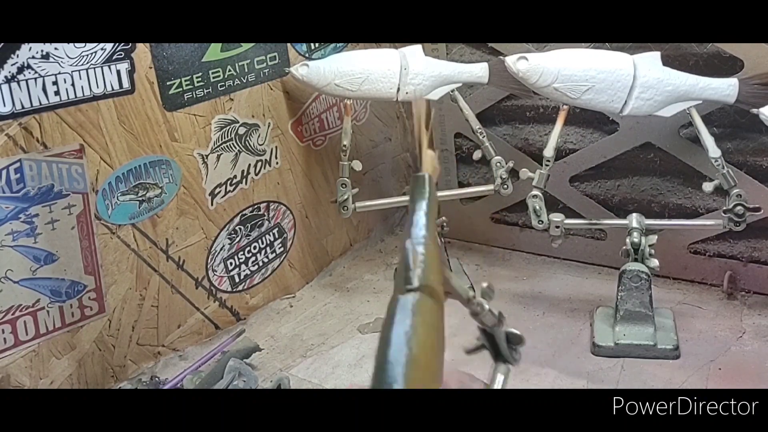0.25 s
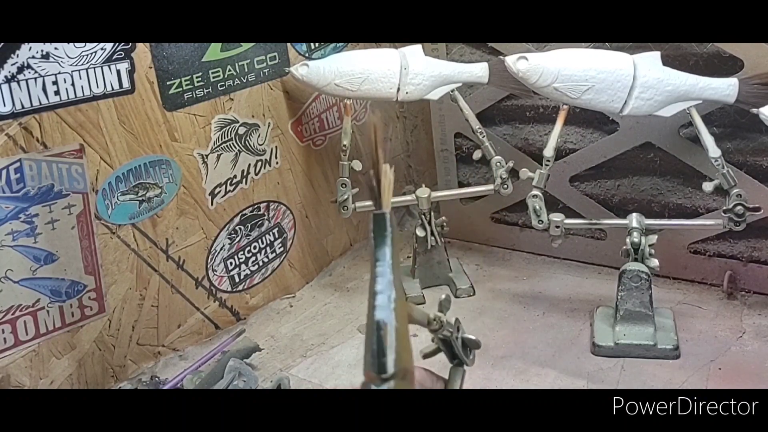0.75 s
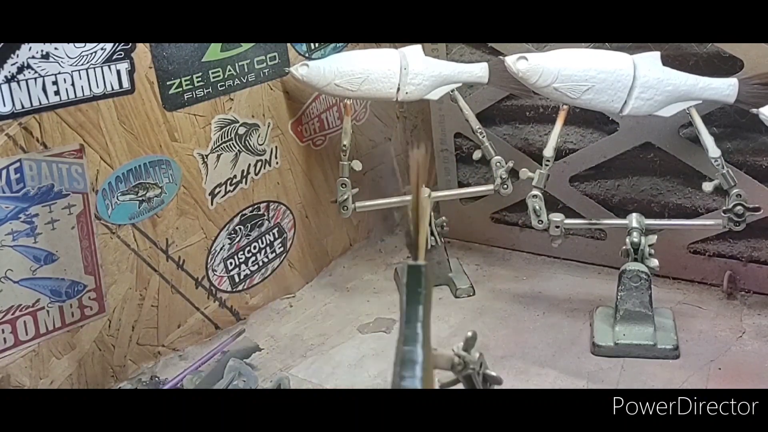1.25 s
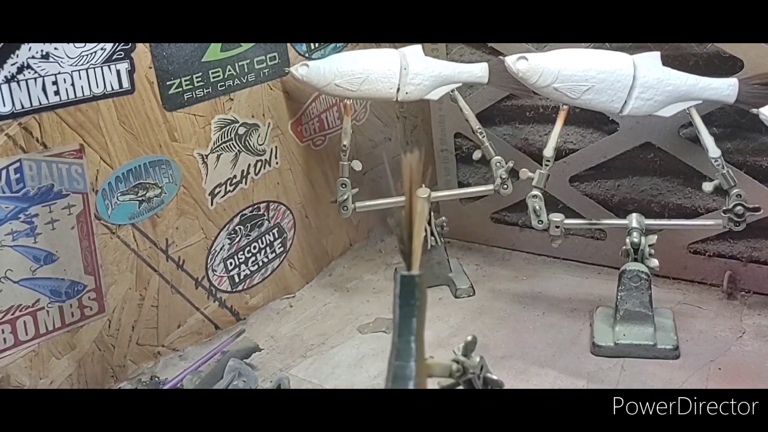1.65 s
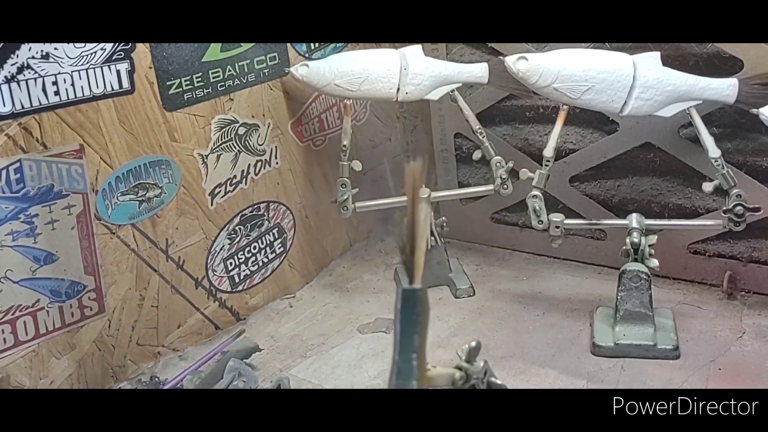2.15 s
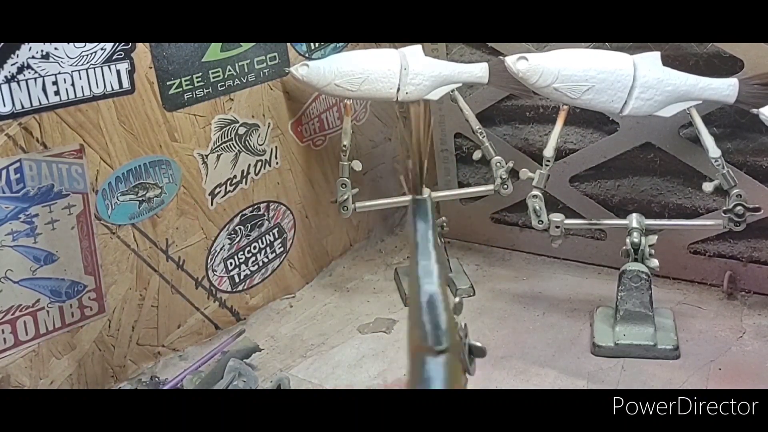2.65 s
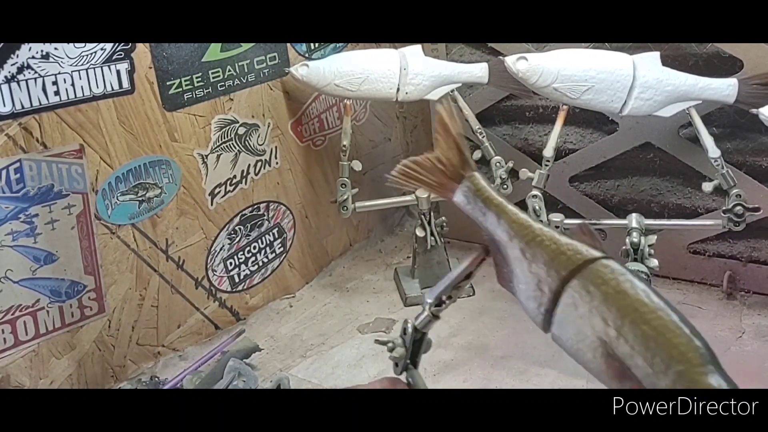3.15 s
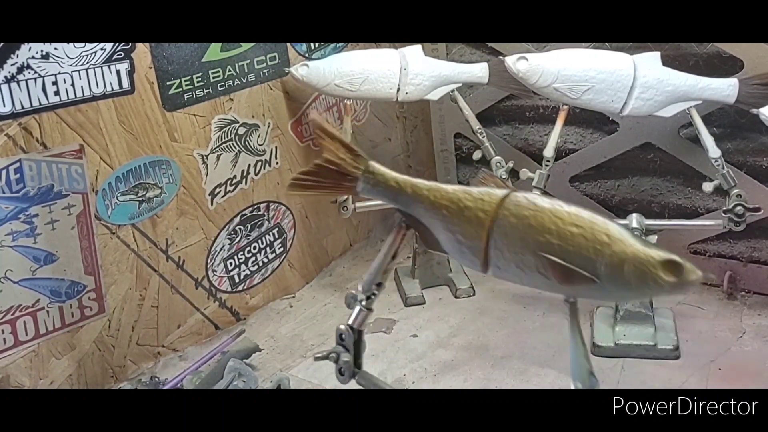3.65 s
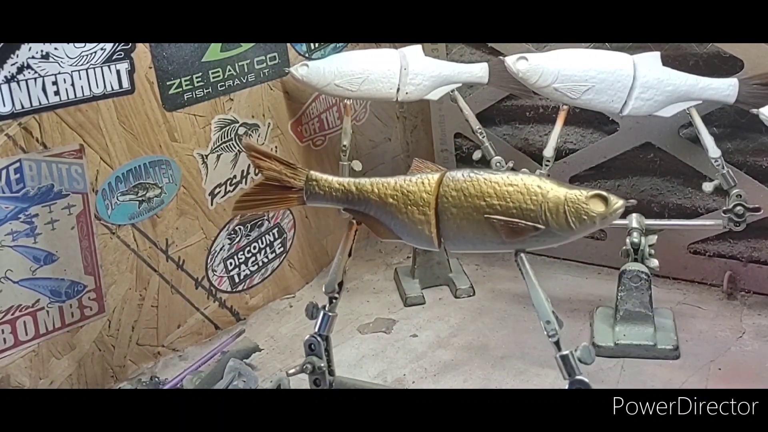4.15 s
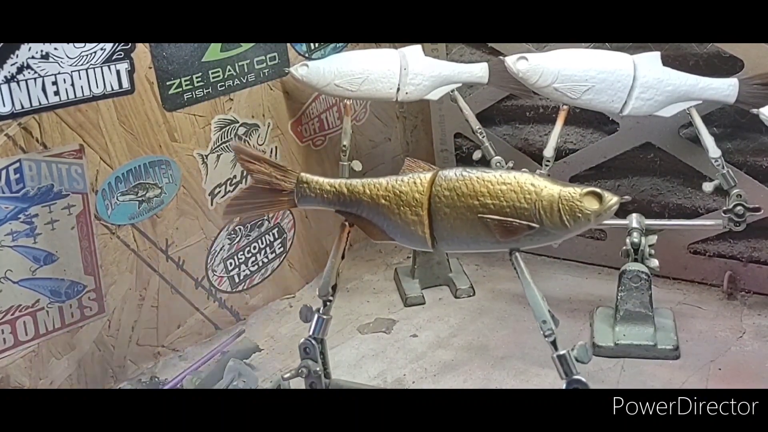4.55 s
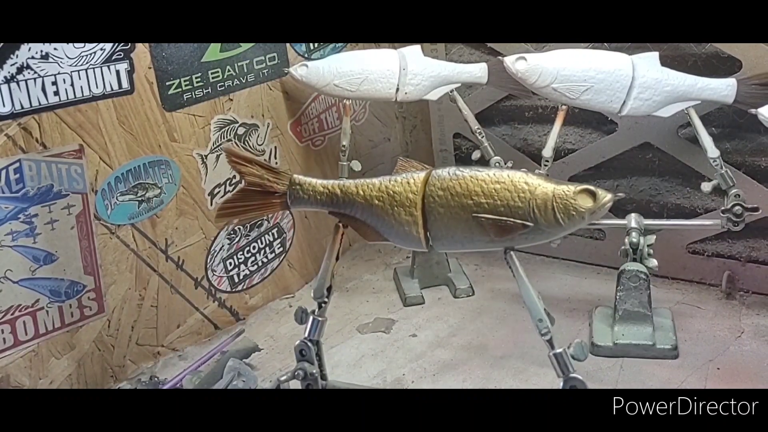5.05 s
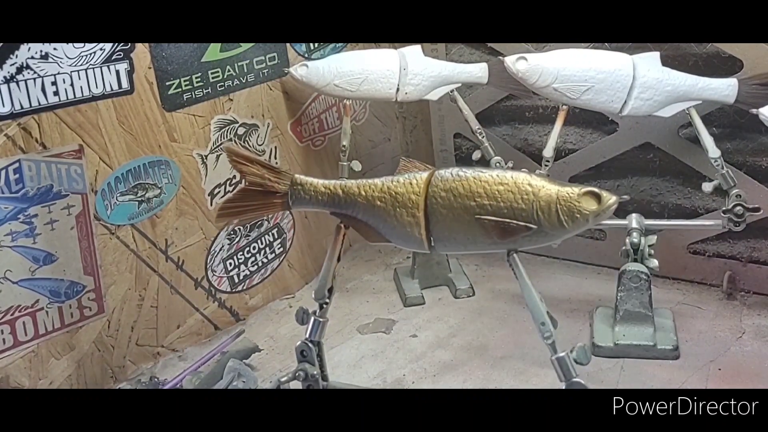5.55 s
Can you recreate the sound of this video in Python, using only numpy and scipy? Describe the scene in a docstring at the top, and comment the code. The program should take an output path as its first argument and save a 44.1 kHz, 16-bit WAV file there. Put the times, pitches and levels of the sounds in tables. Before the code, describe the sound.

A small, dry workshop with faint low room noise and a wavering fan hum, picked up close in stereo. From 0 to 0.9 s a lure stand drags dully on the bench, with a cluster of sharp, ringing creaks around 0.3-0.6 s and faint thin paired tones. An airbrush sprays bright, breathy hiss at 1.16-1.5 s and again, shorter, at 2.04-2.23 s; each opens quickly, holds and cuts off with a metallic tick. As each ends, low air gusts thump the left microphone, the second much harder. From 2.8 to 4.3 s a distant bird sings about eleven quick falling, echoing chirps, while a soft bump lands at 3.13 s and dry cracks, rubs and small knocks follow, densest near 3.8 s. Two more sprays come at 4.6-4.9 s and 5.23-5.54 s, slightly left. A very faint click follows the first, a clear one the last at 5.6 s.

```python
"""In a small workshop, close to the left microphone, an airbrush sprays a fishing lure in four bursts.
Each burst is turbulent noise combed by reflections; a click of the valve with ringing metal ends it.
Low-frequency eddies from the jet twice buffet the microphone. The lure's stand creaks in noise cracks
with ringing modes, and drags and bumps on the bench. A bird outside sings falling notes as gliding
sines, thin pairs of tones come and go, and a fan hums as wavering lines over faint room noise."""
import sys
import numpy as np
from scipy import signal
from scipy.fft import rfft, irfft
from scipy.io import wavfile
from scipy.ndimage import uniform_filter1d

SR = 44100
rng = np.random.default_rng(int(sys.argv[2]) if len(sys.argv) > 2 else 0)


def persist_wave(psi):
    """Save psi, clipped to +-1, as 16-bit WAV."""
    counts = np.round(np.clip(psi, -1, 1) * 32767).astype(np.int16)
    wavfile.write(sys.argv[1], SR, np.atleast_2d(counts).T)


N = 255780
TIME = np.arange(N) / SR
BIN_HZ = np.fft.rfftfreq(N, 1 / SR)


def undb(db):
    """Logarithmic level: decibels become an amplitude gain."""
    return 10 ** (np.asarray(db) / 20)


def unit(x):
    """Normalisation: scale to an rms of 1."""
    return x / np.sqrt(np.mean(x ** 2))


def db_at(points, hz):
    """Spectral envelope: interpolate (Hz, dB) points on a log-frequency axis."""
    point_hz, db = np.transpose(points)
    return np.interp(np.log(hz + 1), np.log(point_hz), db)


def tint(x, db):
    """Linear filtering: apply a gain in dB to every frequency bin."""
    return irfft(rfft(x) * undb(db), N)


def steep_lowpass_db(corner_hz):
    """Butterworth response: the gain in dB of a second-order low-pass at every frequency bin."""
    return -10 * np.log10(1 + (BIN_HZ / corner_hz) ** 4)


def noise(colour):
    """Coloured noise: uncorrelated left and right of one spectrum, rms 1."""
    white = rng.standard_normal((2, N))
    return unit(tint(white, db_at(colour, BIN_HZ)))


def walk(rate):
    """Slow random modulation: random steps at the given rate in Hz, smoothed, rms 1."""
    size = int(SR / rate)
    steps = np.repeat(rng.standard_normal(N // size + 1), size)
    return unit(uniform_filter1d(steps, size)[:N])


def lowpass(x, hz):
    """Treble attenuation: a second-order Butterworth low-pass."""
    return signal.sosfilt(signal.butter(2, hz, fs=SR, output="sos"), x)


def pan(db):
    """Interaural level difference: left and right gains for left minus right in dB."""
    return undb(np.array([[db], [-db]]) / 2)


def add(out, s, sound):
    """Superposition: mix a sound in at s seconds."""
    start = max(int(s * SR), 0)
    out[:, start:start + sound.shape[-1]] += sound[..., :N - start]


def fade(t, t60):
    """Exponential decay: 60 dB down after t60 seconds."""
    return np.exp(-np.log(1000) * t / t60)


def ring(modes, t):
    """Modal synthesis: decaying sines, each with its own random phase at the two microphones."""
    total = 0
    for hz, db, t60 in modes:
        cycles = hz * t + rng.random((2, 1))
        total = total + undb(db) * fade(t, t60) * np.sin(2 * np.pi * cycles)
    return total


def swell(events, shape):
    """Gain envelopes, summed: each is 20 dB down one rise before and one fall after its peak."""
    total = 0
    for s, db, rise, fall in events:
        distance = np.maximum((s - TIME) / rise, (TIME - s) / fall)
        total = total + undb(db - 20 * distance ** shape)
    return total


def reverb(x, t60, wet_db):
    """Diffuse reverberation: the sound plus dense, exponentially decaying reflections."""
    t = TIME[:SR // 2]
    tail = rng.standard_normal((2, len(t))) * fade(t, t60) * (t > .003)
    tail /= np.sqrt(np.sum(tail ** 2) / 2)
    return x + undb(wet_db) * signal.fftconvolve(x, tail, axes=1)[:, :N]


# Spectrum of the quiet room. Each row: frequency in Hz, relative level in dB per Hz.
ROOM_COLOUR = [(25, -34.5), (45, -14.5), (70, -4), (110, -7), (150, -15.5), (270, -16.5), (420, -21),
               (850, -24.5), (1200, -30.5), (1950, -29), (3700, -29.5), (7000, -37.5), (11000, -40),
               (15400, -46.5)]
# Lines of the fan. Each row: frequency in Hz, level in dB about which it wavers.
FAN_LINES = [(120, -63), (357, -75.5), (1005, -86), (1534, -85), (1890, -91), (2710, -88.5), (3752, -92),
             (10907, -90)]


def workshop(room_db=-58, side_db=2.0, waver_db=3.5):
    """Spatial coherence: long waves reach both microphones alike; the fan adds wavering sine lines."""
    spread = 1 / (1 + (230 / (BIN_HZ + 1)) ** 2)
    mid, side = rfft(noise(ROOM_COLOUR))
    out = irfft(mid + np.outer([1, -1], side * spread) * undb(side_db), N) * undb(room_db)
    for line_hz, db in FAN_LINES:
        # the higher the line, the further apart its left and right phases may lie, up to half a cycle
        offset = rng.random((2, 1)) * min(line_hz / 3000, .5)
        cycles = np.cumsum(line_hz + 3 * walk(16)) / SR + offset
        out = out + undb(db + waver_db * walk(1.93)) * np.sin(2 * np.pi * cycles)
    return out


# Faint far-off pairs of tones. Each row: start in seconds, lower frequency in Hz,
# upper frequency in Hz, level of the lower tone in dB before it swells and wavers.
TONE_PAIRS = [(0, 879, 1206, -56), (.623, 900, 1200, -63), (4.35, 878, 1340, -68.5), (5.58, 815, 1440, -62)]


def far_tones(duration_s=0.29, upper_db=-6.0, sag=0.011, waver_db=6.0):
    """Amplitude and frequency modulation: thin tone pairs swell, waver, sag a little in pitch and fade."""
    out = np.zeros((2, N))
    u = np.arange(int(duration_s * SR)) / (duration_s * SR)
    for s, lower_hz, upper_hz, db in TONE_PAIRS:
        for hz, tone_db in (lower_hz, db), (upper_hz, db + upper_db):
            pitch = hz * (1 + sag * (.5 - u)) + 9 * walk(110)[:len(u)]
            cycles = np.cumsum(pitch) / SR + rng.random((2, 1)) / 2
            gain = undb(tone_db + waver_db * walk(30)[:len(u)]) * np.sqrt(np.sin(np.pi * u))
            add(out, s, gain * np.sin(2 * np.pi * cycles))
    return out


# The bird's run. Each row: start in seconds, level in dB relative to the other notes.
BIRD_NOTES = [(2.827, -39), (2.97, -37.5), (3.11, -37), (3.238, -37.5), (3.365, -36.5), (3.513, -36),
              (3.661, -36.5), (3.81, -34.5), (3.961, -37.5), (4.123, -39), (4.279, -37)]


def bird(note_s=.048, settled_hz=4564, start_high_hz=421, settle_s=.28, drop=.35, drop_spread=0.078,
         octave_db=-10, octave_hz=7400, octave_width_hz=600, level_db=-8.0):
    """Frequency glides: whistled notes hang and then plunge with a rasp, smeared by echoes."""
    out = np.zeros((2, N))
    rasp = walk(1500)
    u = np.arange(int(note_s * SR)) / (note_s * SR)
    envelope = np.interp(u, [0, .12, .22, .6, 1], [0.063, 0.2, 1.0, 1.0, 0.34])
    for s, db in BIRD_NOTES:
        # the run starts high and settles on one pitch
        top_hz = settled_hz + start_high_hz * np.exp(-((s - BIRD_NOTES[0][0]) / settle_s) ** 2)
        plunge = drop * (1 + drop_spread * rng.uniform(-0.93, 1))  # no two notes fall alike
        roughness = .08 * u ** 1.4 * rasp[int(s * SR):][:len(u)]
        hz = top_hz * (1 - plunge * u ** 2.3 + roughness)
        phase = 2 * np.pi * np.cumsum(hz) / SR
        # the octave swells as it crosses a resonance of the beak
        beak = 1 / np.hypot(1, (2 * hz - octave_hz) / octave_width_hz)
        tone = np.sin(phase) + undb(octave_db) * beak * np.sin(2 * phase)
        add(out, s, undb(db + level_db) * envelope * tone)
    scattered = reverb(out, t60=.24, wet_db=11)
    return reverb(scattered, t60=0.4, wet_db=-8)


# Spectrum of the shaken boards. Each row: frequency in Hz, relative level in dB per Hz.
BOARD_COLOUR = [(25, -38), (50, -10), (80, -7.5), (120, 5), (165, -7), (220, -5.5), (330, -11), (450, -18),
                (650, -22.5), (1400, -33), (2600, -33), (5000, -53.5)]
# The stand drags. Each row: time of the peak in seconds, level in dB, rise in seconds, fall in seconds.
BENCH_DRAGS = [(.06, -34.5, 0.42, 0.52), (.31, -45, 0.064, 0.18), (.805, -37.5, .022, 0.26)]
# Soft bumps. Each row: start in seconds, level in dB that scales the board modes.
BENCH_BUMPS = [(3.128, -25), (3.225, -40), (3.319, -43.5), (3.473, -47), (3.79, -39), (3.848, -41)]


def bench(apart_db=-13, push_s=0.0045):
    """Structure-borne sound: drags and bumps shake the boards, nearly alike at both microphones."""
    common, apart = noise(BOARD_COLOUR)
    rumble = common + undb(apart_db) * np.outer([1, -1], apart)
    out = rumble * swell(BENCH_DRAGS, shape=1.16)
    t = TIME[:SR // 3]
    # Each row: frequency in Hz, relative level in dB, 60 dB decay time in seconds.
    boards = [(78.7, -5.0, 0.14), (118.0, 2.0, 0.084), (176.6, -15, 0.18), (250, -11.5, 0.048),
              (370, -15, 0.033)]
    for s, db in BENCH_BUMPS:
        push = np.minimum(t / push_s, 1)
        add(out, s, undb(db) * push * ring(boards, t)[0])
    return out


# The joints slip. Each row: start in seconds, level in dB that scales the crack and the ringing,
# relative level in dB of the crack's low part.
JOINT_SLIPS = [(0.3088, -37, 18.5), (0.3297, -19, 8), (0.3397, -27, 11), (0.3478, -15.5, 0),
               (0.4181, -31.5, 9), (0.4612, -35.5, 11), (0.4746, -32, 0), (0.5624, -38, -10),
               (2.84, -41.5, -9), (2.9273, -42.5, 0), (3.142, -32.5, 8), (3.4901, -36.5, -9),
               (3.693, -33, -9), (3.784, -27, 0), (3.7911, -29, 15.5), (3.8286, -30.5, 8),
               (3.8476, -27, -8), (3.868, -27.5, -7), (3.912, -32.5, -13), (4.2297, -35.5, -10)]
# Spectrum of a slip. Each row: frequency in Hz, relative level in dB per Hz.
JOINT_COLOUR = [(290, -59.5), (500, -18), (2390, -14.5), (2680, -5.5), (4000, -10), (4960, -3),
                (5480, -4.5), (8190, -4), (11400, -8.5), (15400, -16.5)]
# Modes of the stand. Each row: frequency in Hz before the grip shifts it, relative level in dB,
# 60 dB decay time in seconds before the grip shifts it.
JOINT_MODES = [(2960, 4, 0.028), (4910, -7, 0.05), (6800, 2, .04), (7060, 13.5, 0.062), (7690, 18, 0.026),
               (7800, -9, 0.082)]
# Finger strokes. Each row: time of the peak in seconds, relative level in dB,
# rise in seconds, fall in seconds.
FINGER_RUBS = [(.1, -62, .6, 0.78), (.345, -40, 0.072, .035), (.48, -57, 0.073, 0.069),
               (.81, -63, 0.22, 0.39), (3.17, -52.5, 0.038, 0.48), (3.57, -49.5, 0.12, 0.069),
               (3.82, -48, 0.16, 0.17), (4.02, -43.5, 0.086, 0.045), (4.33, -58, 0.42, 0.1)]


def stand(crack_t60=0.017, ring_db=-22, body_db=-4, rub_db=-1, rise_s=0.00056):
    """Stick-slip friction: tight joints give dry cracks that ring the stand; fingers rub unevenly."""
    out, grit, t = np.zeros((2, N)), noise(JOINT_COLOUR), TIME[:SR // 6]
    body = lowpass(noise(JOINT_COLOUR), 2600)
    for s, db, low_db in JOINT_SLIPS:
        span = int(s * SR) + np.arange(len(t))
        crack = (grit[:, span] + undb(body_db + low_db) * body[:, span]) * fade(t, crack_t60)
        grip = 1 + 0.035 * rng.standard_normal()  # the hand's grip shifts the modes
        sound = crack + undb(ring_db) * ring(JOINT_MODES, t * grip)
        add(out, s, undb(db) * np.minimum(t / rise_s, 1) * sound)
    catching_db = 3 * walk(300) + 2.5 * walk(35)
    return out + grit * swell(FINGER_RUBS, shape=1.25) * undb(rub_db + catching_db)


# Spectrum of the eddies. Each row: frequency in Hz, relative level in dB per Hz.
EDDY_COLOUR = [(20, -25.5), (50, -12), (78, 4), (125, -2), (155, -9.5), (190, -4), (300, -13.5), (500, -26),
               (850, -32), (2000, -52)]
# Gusts at the left microphone. Each row: time of the peak in seconds, level in dB,
# rise in seconds, fall in seconds.
JET_GUSTS = [(1.523, -19, 0.057, 0.054), (2.18, -35, 0.16, 0.14), (2.243, -12.5, .028, 0.047),
             (4.83, -41, .15, 0.11), (5.235, -45.5, 0.018, 0.16)]
# Large eddies strike the left port. Each row: time of the core in seconds, half-length in seconds,
# peak level in dB.
EDDY_PUFFS = [(1.514, 0.0027, -13.5), (2.248, .0018, -1), (2.274, 0.0017, -14.5)]


def draught(lean_db=28, dull_hz=260, fierce_db=-14):
    """Turbulent pressure: eddies roll over the left microphone port; weak ones of their own reach the right."""
    eddies = noise(EDDY_COLOUR)
    strength = np.sqrt(uniform_filter1d(eddies ** 2, size=SR // 50))
    eddies = unit(eddies / strength ** .7)  # successive eddies are of similar strength
    gust = swell(JET_GUSTS, shape=1.47)
    # only a fierce gust breaks into small, bright eddies
    large = tint(eddies, steep_lowpass_db(dull_hz))
    brightness = np.sqrt(np.minimum(gust / undb(fierce_db), 1))
    left, right = gust * (large + (eddies - large) * brightness)
    for s, half_s, db in EDDY_PUFFS:
        u = (TIME - s) / half_s
        # sharp suction at the core, a push either side
        left = left + undb(db) * (u ** 2 - 1) / (1 + u ** 2) ** 2
    return np.array([left, undb(-lean_db) * right])


# Spectrum of the jet. Each row: frequency in Hz, relative level in dB per Hz.
JET_COLOUR = [(210, -41.5), (350, -23), (504, -25.5), (797, -20.5), (1200, -22.5), (1320, -16), (1480, -20),
              (2920, -10), (4010, -9.5), (7200, -2.5), (8850, -2.5), (12900, -1.5), (15400, -3)]
# The air valve snaps shut. Each row: start in seconds, relative level of the tick in dB,
# level of the last puff of air in dB, left minus right in dB.
VALVE_CLICKS = [(1.5426, -24.5, -30, -2), (2.2689, -24, -31, -4.5), (4.9877, -38, -47, 2),
                (5.6036, -19.5, -41, 4)]
# Modes of the airbrush body. Each row: frequency in Hz, relative level in dB, 60 dB decay time in seconds.
BODY_MODES = [(8200, 0, .16), (8860, -6, .04), (11590, 2, .018), (11740, -7, .06), (12030, -9, .05),
              (13910, -9, .05), (14380, -8, .05)]


def valve(tick_db=5, tick_t60=0.004, puff_t60=0.11, ring_db=-15):
    """Impact excitation: the seating valve ticks, rings the metal body and lets out a last puff."""
    out, air, t = np.zeros((2, N)), noise(JET_COLOUR), TIME[:SR // 4]
    for s, db, puff_db, lean_db in VALVE_CLICKS:
        escape = undb(db + tick_db) * fade(t, tick_t60) + undb(puff_db) * fade(t, puff_t60)
        span = (int(s * SR) + np.arange(len(t))) % N
        snap = air[:, span] * escape
        add(out, s, pan(lean_db) * (snap + undb(db + ring_db) * ring(BODY_MODES, t)))
    return out


# Pulls of the trigger. Each row: pressed at in seconds, released at in seconds, relative level in dB,
# left minus right in dB once the aim has settled, time constant of easing open in seconds.
TRIGGER_PULLS = [(1.159, 1.51, -20.5, 0.5, 0.043), (2.039, 2.231, -21, 2, 0.024),
                 (4.588, 4.905, -20.5, 3.5, 0.039), (5.228, 5.538, -21, 2, 0.024)]


def trigger(crack_s=0.0084, crack_db=-15.5, bleed_db_per_s=730, aim_db=8, aim_s=0.068, unlean_db_per_s=194):
    """Flow control: each pull cracks the valve quickly, eases it open, holds, then bleeds the air away."""
    flow = 0
    for pressed, released, db, lean_db, ease_s in TRIGGER_PULLS:
        age = np.maximum(TIME - pressed, 0)
        closing = np.maximum(TIME - released, 0)
        air_db = db + crack_db * np.exp(-age / ease_s) - bleed_db_per_s * closing
        # the jet starts aimed near the left microphone and swings onto the lure; dying, it loses its lean
        side_db = lean_db + aim_db * np.exp(-age / aim_s) - unlean_db_per_s * closing
        flow = flow + np.minimum(age / crack_s, 1) * undb(air_db + np.outer([1, -1], side_db) / 2)
    return flow


def paths(x, bounce, sway, count=7, order=4):
    """Comb filtering: direct sound plus bounces off lure, stand and walls that shift as the hand moves."""
    fine = signal.resample_poly(x, order, 1)  # upsampled, for finely graded delays
    out = x
    for lag in rng.uniform(0.0004025, .005, count):
        arrival = (TIME - lag - sway * walk(1.497)) * order * SR
        index = np.clip(np.rint(arrival).astype(int), 0, len(fine) - 1)
        out = out + bounce * fine[index]
    return unit(out)


# The right microphone lies in shadow. Each row: frequency in Hz, extra left minus right in dB.
SHADOW = [(200, -8.5), (1200, 3.5), (2200, 2.5), (4500, 2), (7200, 0), (9500, 2.5), (13000, 6.5),
          (15500, 2.5)]


def spray(level_db=2, flutter_db=0.72, sway_s=.00006, port_lag_s=.0003, body_hz=3500, body_growth=0.93):
    """Jet noise: one turbulent jet hisses, and each microphone hears it through its own comb of reflections."""
    jet = noise(JET_COLOUR)[0]
    left = paths(jet, .2, sway_s)
    right = paths(np.roll(jet, int(port_lag_s * SR)), .4, sway_s)
    # the cloud of spray around the lure adds hiss that is unrelated left and right
    hiss = unit(np.array([left, right]) + .8 * noise(JET_COLOUR))
    hiss = tint(hiss, np.outer([1, -1], db_at(SHADOW, BIN_HZ)) / 2)
    flow = trigger()
    # a half-open valve hisses thinly; the large, low eddies need full flow
    opening = np.minimum(flow.mean(axis=0) / undb(-21.5), 1)
    body = tint(hiss, steep_lowpass_db(body_hz))
    hiss = hiss - body * (1 - opening ** body_growth)
    return hiss * flow * undb(level_db + flutter_db * walk(70))


def scene():
    """Superposition of sources: close sounds in a small, dry room, over the bird, far tones and fan."""
    background = workshop() + far_tones() + bird()
    handling = bench() + reverb(stand(), t60=0.12, wet_db=-6.0)
    airbrush = reverb(valve() + spray(), t60=0.1, wet_db=-13.0)
    return background + handling + draught() + airbrush


def record(dry):
    """Band limiting: a high-pass thins the deepest bass and an elliptic low-pass cuts the top steeply."""
    thinned = signal.sosfilt(signal.butter(2, 42, "highpass", fs=SR, output="sos"), dry)
    # order 12, 0.1 dB ripple, 80 dB rejection, edge at 15600 Hz
    return signal.sosfilt(signal.ellip(12, .1, 80, 15600, fs=SR, output="sos"), thinned)


dry = scene()
out = record(dry)
persist_wave(out)
```